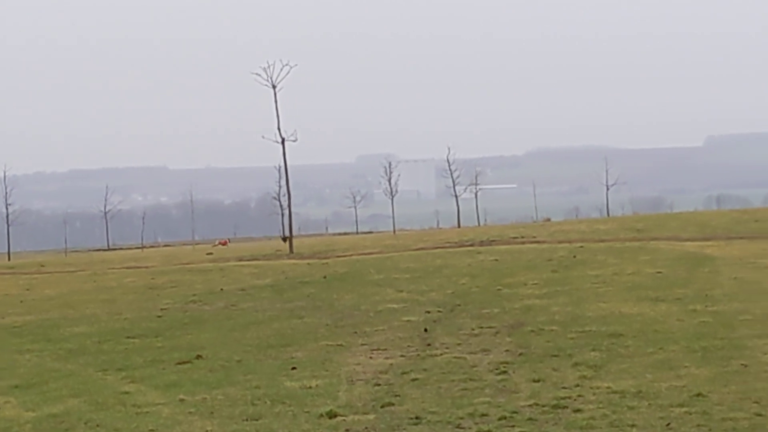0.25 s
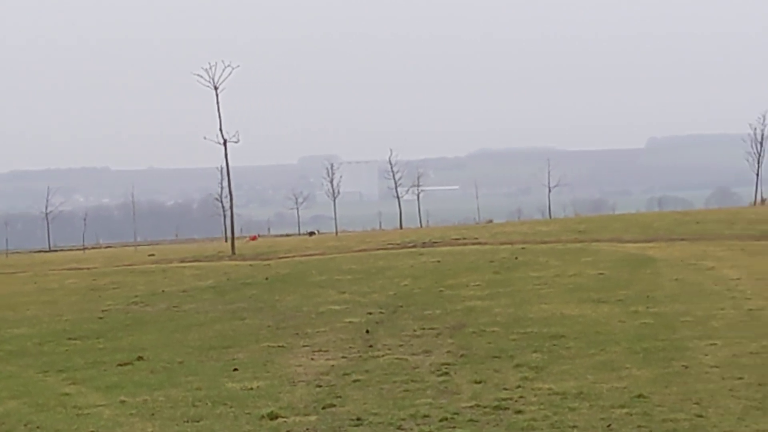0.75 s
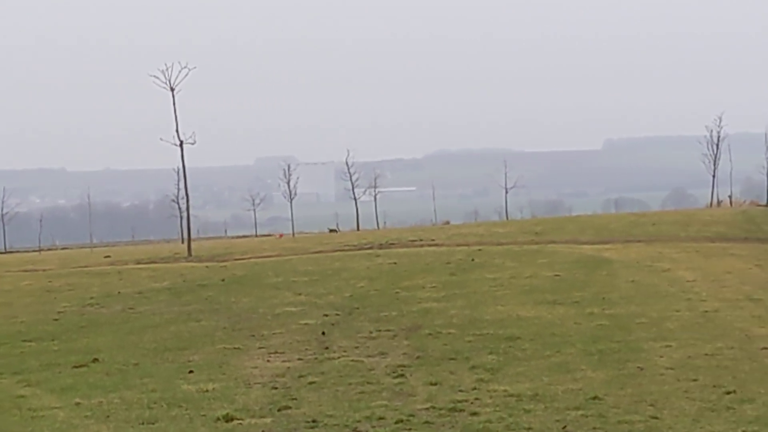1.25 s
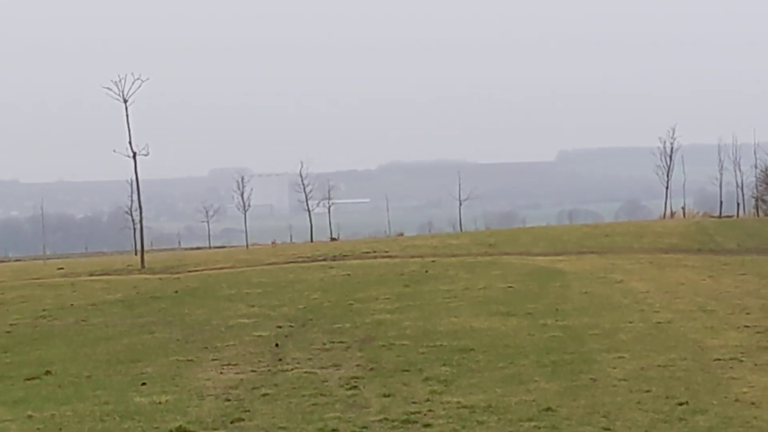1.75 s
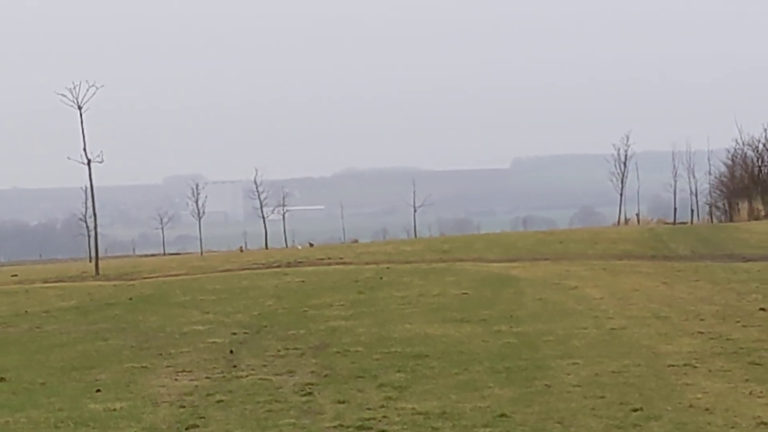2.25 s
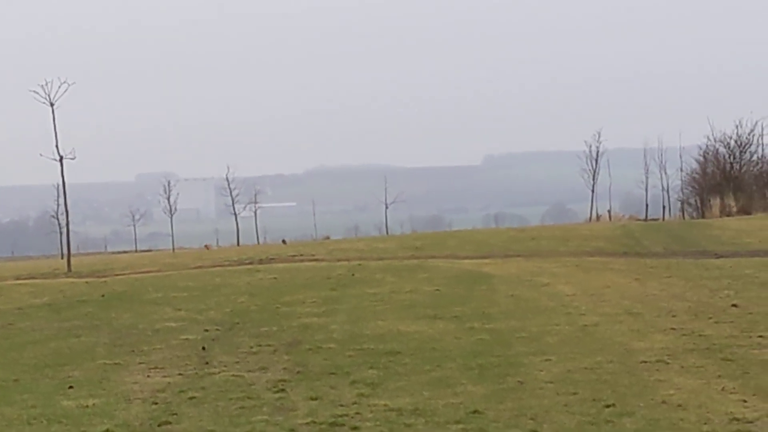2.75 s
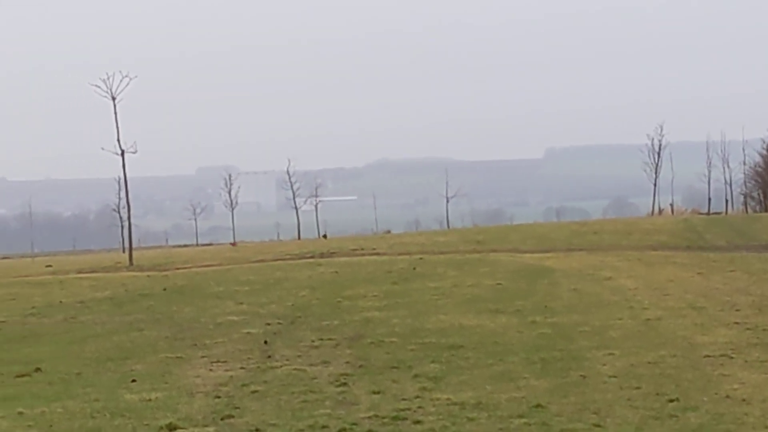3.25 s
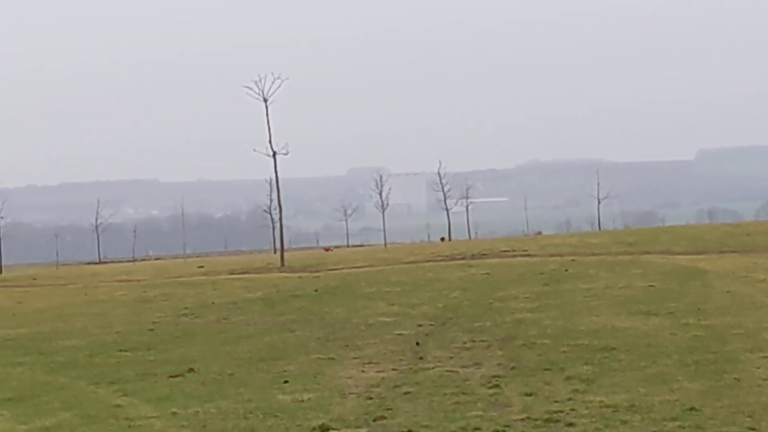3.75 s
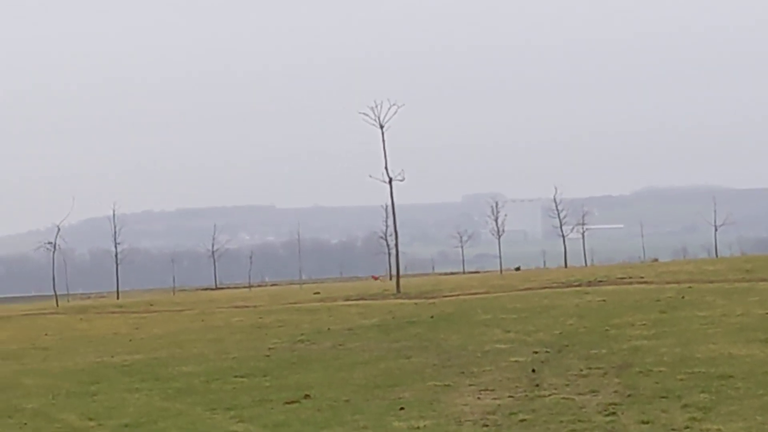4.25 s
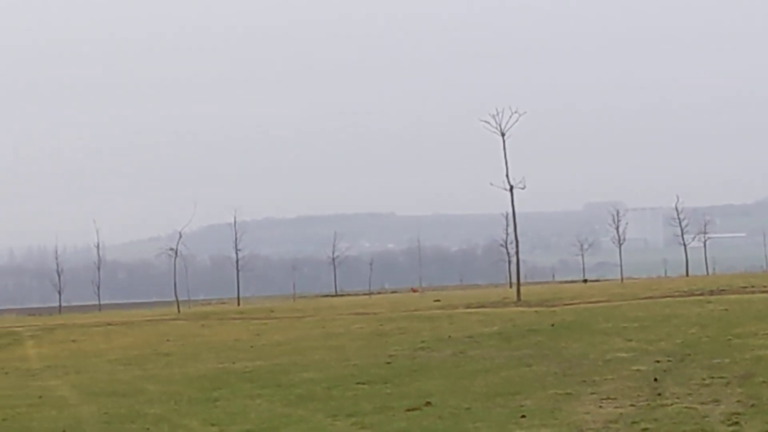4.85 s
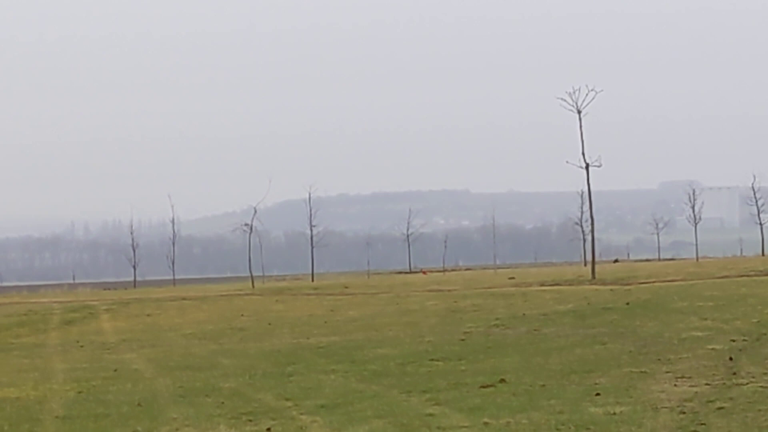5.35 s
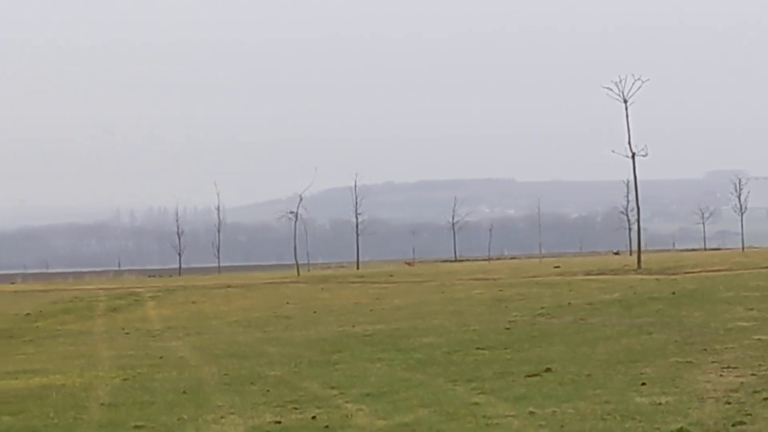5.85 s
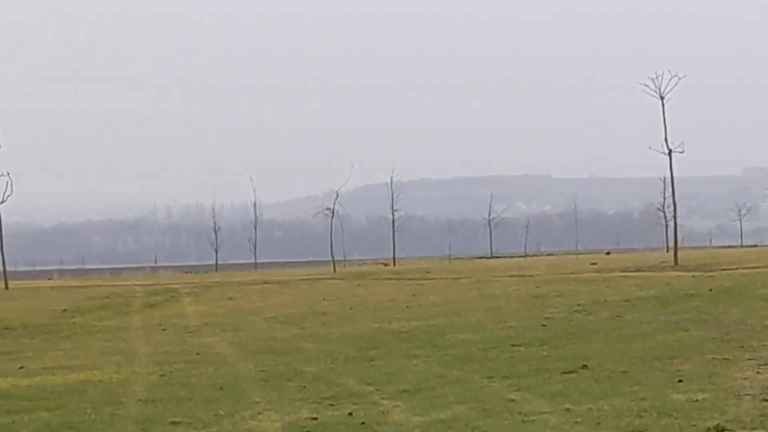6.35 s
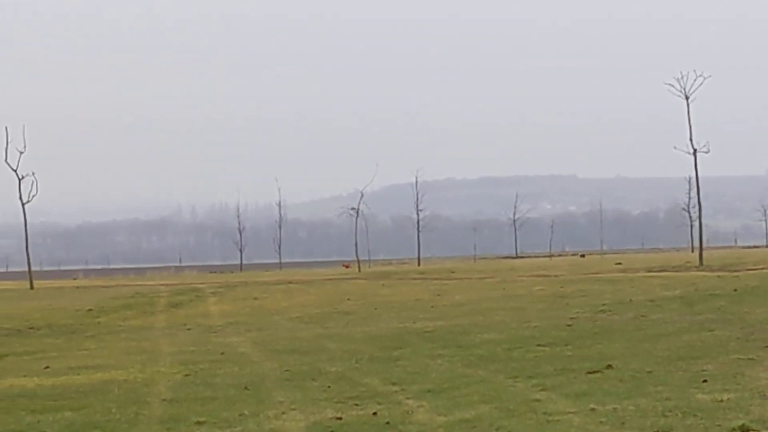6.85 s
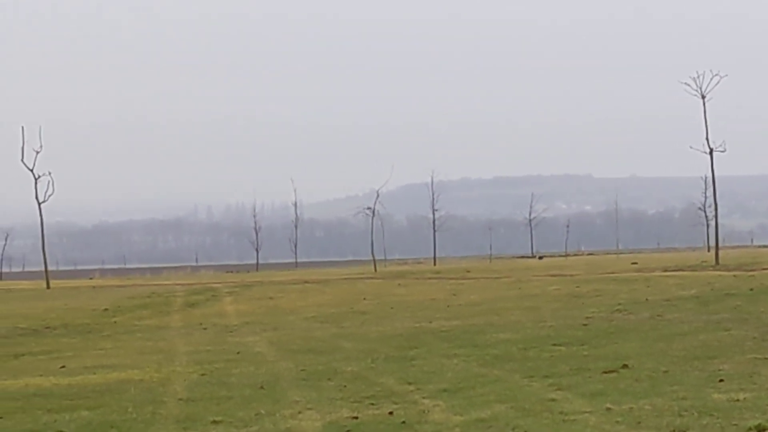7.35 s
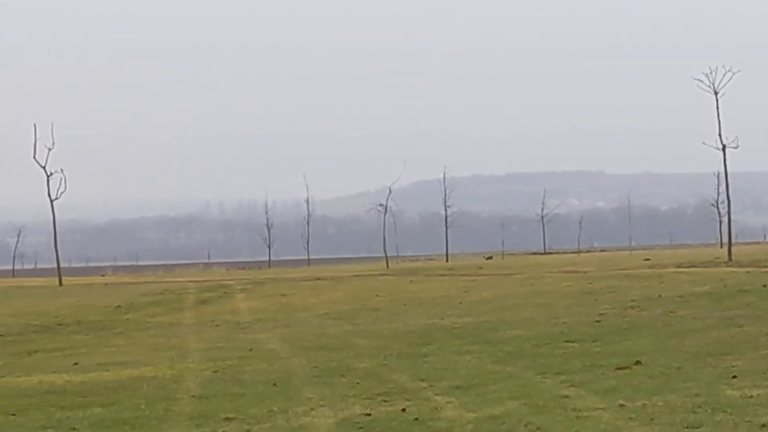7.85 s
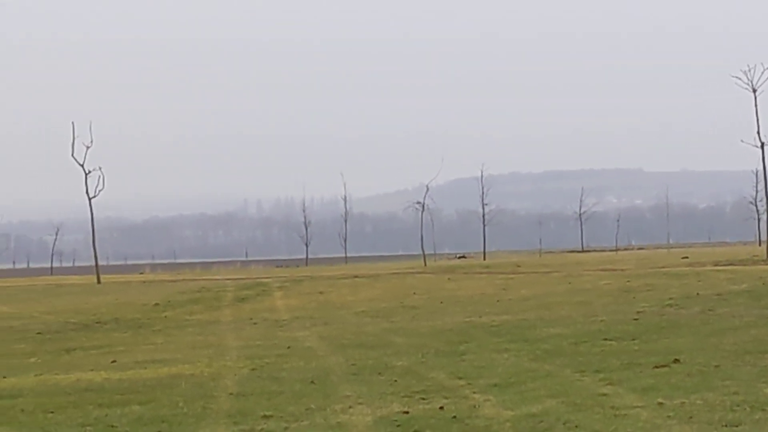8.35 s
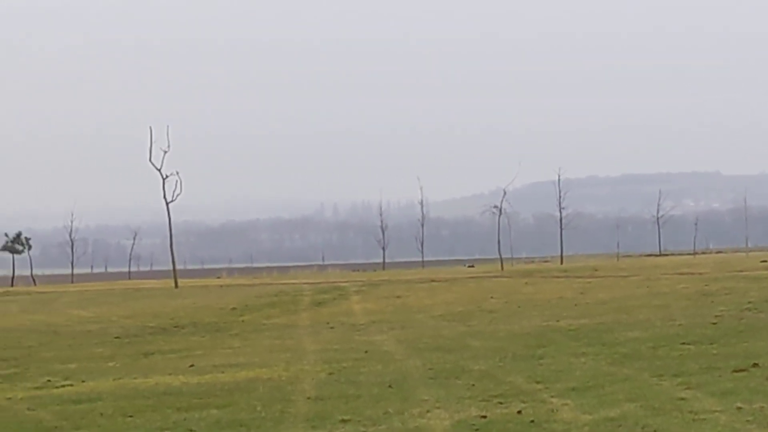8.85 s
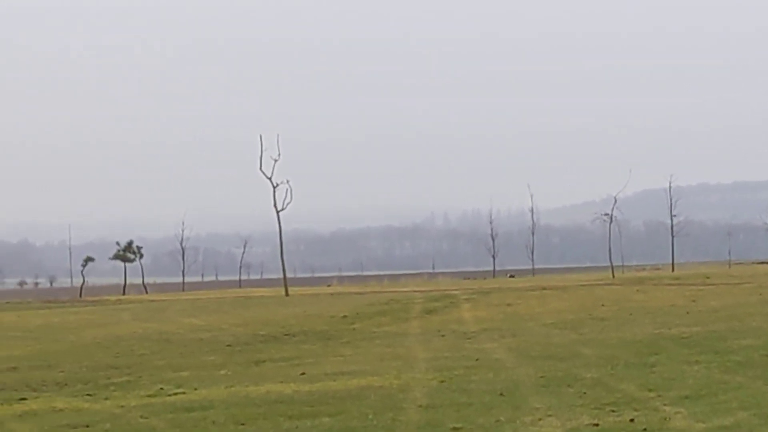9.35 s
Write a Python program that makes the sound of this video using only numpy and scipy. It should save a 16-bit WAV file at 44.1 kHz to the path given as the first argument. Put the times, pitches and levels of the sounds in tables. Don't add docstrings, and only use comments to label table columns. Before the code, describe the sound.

In a grassy open field, a little motor chugs rapidly and continuously with a hollow exhaust knock and breathy hiss. Its fan hum dips under load, then spins back up, again and again. Gusts strike the microphone ports as short, boomy low thumps, partly different left and right, with calmer gaps between. A single faint bird call rises and falls once. No reverberant space, only dry outdoor sound.

```python
import sys
import numpy as np
from scipy import signal
from scipy.fft import rfft, irfft
from scipy.io import wavfile
from scipy.ndimage import uniform_filter1d

SR = 44100
rng = np.random.default_rng(int(sys.argv[2]) if len(sys.argv) > 2 else 0)


def waveform_to_disk(signal):
    frames = np.transpose(np.atleast_2d(signal))
    scaled = np.clip(frames, -1, 1) * 32767
    samples = np.round(scaled).astype(np.int16)
    wavfile.write(sys.argv[1], SR, samples)


def boost(x):
    u = np.asarray(x, float) / 20
    return 10 ** u


N = 423360
T = np.arange(N) / SR
F = np.maximum(np.arange(N // 2 + 1) * SR / N, 1)
RIGHT_LAG_SAMPLES = 22
FAN_MEAN_HZ = 95


def level(x, db):
    return x * boost(db) / np.sqrt(np.mean(x ** 2))


def curves(table):
    s, *columns = np.transpose(table)
    return [np.interp(T, s, column) for column in columns]


def shape(points):
    hz, db = np.transpose(points)
    return np.interp(np.log(F), np.log(hz), db)


def colour(x, db):
    return irfft(rfft(x) * boost(db), N)


def walk(rate):
    k = int(SR / rate)
    steps = np.repeat(rng.standard_normal(N // k + 1), k)
    return 1.42 * uniform_filter1d(uniform_filter1d(steps, k), k)[:N]


# time in seconds, lead over an even beat in cycles.
BEAT_LEAD = [(0.0, 0.125), (0.7, -0.205), (1.2, -0.232), (1.5, -0.067), (1.8, -0.11), (2.89, -0.418),
             (3.19, -0.396), (3.39, -0.515), (3.89, -0.503), (6.09, 0.271), (6.19, 0.224), (6.29, 0.293),
             (6.59, 0.194), (7.38, 0.31), (8.08, 0.276), (8.38, 0.38), (8.78, 0.226), (9.6, 0.4)]


def firing_times():
    firing_hz = 17.8
    cycles = firing_hz * T + curves(BEAT_LEAD)[0]
    return np.interp(np.arange(1, int(cycles[-1]) + 1), cycles, T) - .0067


# pitch in Hz, decay in ms, level in dB, delay in ms (its sign does not matter), starting point in turns.
EXHAUST_RINGS = [
    (158, 6.8, -0.5, 8.5, 0.14),
    (273.5, 1.74, 3.5, 1.5, 0.15),
    (382.5, 2.88, 4, 0.5, 0.16),
    (597.8, 4.8, -5.5, 0.5, 0.78),
    (744, 1.6, -7, 1, 0.43),
    (1337, 3.6, -12.5, -6.5, 0.078),
]


def exhaust(times):
    firing_scatter_db, ring_scatter_db, detune, slip_ms = 1.4, 1.4, .025, .2
    out, t = np.zeros(N + SR), np.arange(SR // 16) / SR
    chance = rng.standard_normal((len(times), len(EXHAUST_RINGS), 4))
    for s, draw in zip(times, chance):
        bark = 0
        for (hz, decay_ms, db, delay_ms, turns), luck in zip(EXHAUST_RINGS, draw):
            since = np.maximum(t - abs(delay_ms + slip_ms * luck[0]) / 1000, 0)
            age = since * 1000 / decay_ms
            swell = age * np.exp(1 - age)
            pitch = hz * (1 + detune * luck[2])
            tone = np.sin(2 * np.pi * (pitch * since + turns))
            bark = bark + boost(db + ring_scatter_db * luck[1]) * swell * tone
        i = int(s * SR)
        out[i:i + len(t)] += bark * boost(firing_scatter_db * draw[0, 3])
    return level(out[:N], 0)


# frequency in Hz, level in dB per Hz.
HISS_COLOUR = [(60, 8), (110, 23.5), (220, 9.5), (450, 12.5), (800, 4.5), (1400, -0.5), (3300, -1),
               (3650, -16), (4900, -9), (5200, -5), (7000, -10.5), (10000, -16.5), (12500, -16.5),
               (15600, -23.5)]
# centre in Hz, width in Hz, boost in dB.
CASING_RINGS = [
    (1550, 60, -4),
    (1700, 35, 4),
    (1850, 80, -3),
    (2280, 170, 5),
    (3120, 100, 3),
    (7600, 300, -3),
    (10250, 350, -6),
]


def air():
    bounce_hz, bounce_peak_hz = 962, 7110
    treble = np.clip((F - 6000) / 800, 0, 1)
    ripple = 2.6 * treble * np.cos(2 * np.pi * (F - bounce_peak_hz) / bounce_hz)
    casing = sum(db * np.exp(-((F - hz) / width) ** 2) for hz, width, db in CASING_RINGS)
    return shape(HISS_COLOUR) + ripple + casing


def puff_gate(times):
    scatter_db, surge_db = 1.6, 1.3
    rise_ms, hold_ms, tail_ms, tail_db = .3, 5., 28., -9
    kicks, t = np.zeros(N), np.arange(SR // 16) / SR * 1000
    kicks[(times * SR).astype(int)] = boost(scatter_db * rng.standard_normal(len(times)))
    burst = np.exp(-(t / hold_ms) ** 2)
    tail = boost(tail_db) * np.exp(-t / tail_ms)
    gate = (1 - np.exp(-t / rise_ms)) * (burst + tail)
    return signal.fftconvolve(kicks * boost(surge_db * walk(6.5)), gate)[:N]


# frequency in Hz, change in dB.
PUFF_COLOUR = [(900, -2), (1400, 0), (1800, -6), (3000, -12), (3700, -2), (4300, -1), (5200, -4), (7000, 2),
               (9000, 4), (15600, 4)]


def gas_puffs(times):
    jet = puff_gate(times) * rng.standard_normal(N)
    return colour(jet, air() + shape(PUFF_COLOUR) + shape([(300, -32), (900, -3)]))


def patchy_noise():
    noise, out, octaves = rfft(rng.standard_normal(N)), 0, np.log2(F)
    for centre in np.arange(5.5, 14.6, .75):
        band = irfft(noise * np.clip(1 - abs(octaves - centre) / .75, 0, 1), N)
        out = out + band * boost(1.33 * walk(1.53))
    return out


# bite in seconds, fan rate then in Hz, let-go in seconds, fan rate then in Hz, whine at the bite in dB.
FAN_LOADS = [(-.3, 101, .08, 92, 0), (.55, 101, .88, 89, 1), (1.22, 94, 1.58, 84.5, -1),
             (2.35, 102, 2.63, 91, 0), (3.12, 99.5, 3.55, 85.5, -2), (3.82, 92.5, 4.05, 86, -4),
             (5.22, 102, 5.5, 91, 2), (6.25, 103, 6.47, 92.5, 3), (6.82, 100.5, 7.17, 88.5, 0),
             (7.42, 94.5, 7.65, 87.5, 2), (7.92, 94, 8.15, 87, 0), (8.62, 95.5, 8.9, 87, -3),
             (9.7, 96, 10, 88, -7)]


def fan_speed():
    spin_up_s, inertia_s = .7, .07
    bite, top_hz, free, low_hz, _ = np.transpose(FAN_LOADS)
    hz = np.interp(T, np.ravel([bite, free], "F"), np.ravel([top_hz, low_hz], "F"))
    for s, low, end, top in zip(free, low_hz, bite[1:], top_hz[1:]):
        up = (T > s) & (T < end)
        progress = np.expm1((s - T[up]) / spin_up_s) / np.expm1((s - end) / spin_up_s)
        hz[up] = low + (top - low) * progress
    return uniform_filter1d(hz, int(inertia_s * SR))


def fan(hz):
    turn = 2 * np.pi * np.cumsum(hz * (1 + .0015 * walk(20))) / SR
    drone_db = -30 + 1 * (hz - FAN_MEAN_HZ)
    drone = boost(-0.5 + 2.9 * walk(7)) * np.sin(turn) + np.sin(2 * turn)
    cowl_db = 6.5 * np.exp(-((5 * hz - 458) / 22) ** 2)
    strain_db = -.08 * np.gradient(hz) * SR
    whine_db = -38 + cowl_db + curves(FAN_LOADS)[-1] + strain_db
    return boost(drone_db + 1.8 * walk(8)) * drone + boost(whine_db + 1.3 * walk(7)) * np.sin(5 * turn)


# time in seconds, throttle effort in dB, carried treble in dB.
ENGINE_EFFORT = [(0, 1, 0), (.6, -0.5, 0.5), (1.05, 1, 0), (1.45, -1, -2), (1.6, -2, 2.5), (2.05, -3.5, -1),
                 (2.4, 0, 0), (2.8, -1.5, -0.5), (3.3, -1.5, -1), (3.6, 1.5, 1.5), (4.8, 1.5, 1),
                 (5.6, 1.5, -1), (6.3, 0.5, 1), (6.9, 0, 0.5), (7.6, 2, -0.5), (8.2, 0, -0.5), (8.9, 2, 1),
                 (9.6, 1.5, 0)]


def engine():
    times, hz = firing_times(), fan_speed()
    effort_db, carried_db = curves(ENGINE_EFFORT)
    carried_db = carried_db + .8 * walk(9)
    faster_hz = hz - FAN_MEAN_HZ
    gear_db = -43.5 + .45 * carried_db + 0.35 * faster_hz
    hiss_db = -40 + carried_db + 0.1857 * faster_hz
    noise = level(colour(patchy_noise(), air()), 11.0) + level(gas_puffs(times), 1.6)
    hiss = colour(noise, shape([(3300, -60), (3900, 0)]))
    gears = noise - hiss
    rush = boost(hiss_db) * hiss + boost(gear_db) * gears
    return boost(-28 + effort_db) * exhaust(times) + rush + fan(hz), hiss_db


# peak in seconds, level in dB, tilt in dB (upper eddies raised and deep ones
WIND_THUMPS = [(0.243, -11.5, -1.5), (1.038, -12.5, -3.5), (1.172, -21, -5), (1.367, -13.5, 15),
               (1.864, -3, 5), (1.921, -4.5, 3.5), (2.044, -10.5, 4), (2.561, -10, 42), (2.597, -8, -2),
               (2.674, -17, -4), (3.946, -18, -5), (4.041, -7.5, -4), (4.35, -13, -5.5), (4.873, -5.5, 7),
               (5.053, -3.5, -1.5), (5.473, -15, -4), (6.233, -5, -1), (6.518, -4.5, 4), (6.632, -6.5, 14),
               (6.715, -16, 10), (7.149, -15.5, 2), (7.611, -10.5, -1), (7.698, -13.5, 0), (8.092, -11, 4),
               (8.279, -7, 5), (8.376, -18, 1), (8.494, -13, 11), (8.705, -10.5, 1), (9.259, -10, -1)]
# full strength reached in seconds, level in dB, hold after that in seconds, rise and
# fade in dB per second, tilt in dB (upper eddies raised and deep ones lowered by this much).
WIND_SWELLS = [(0, -18.5, .01, 193, 1), (0.53, -24.5, 0.16, 40, -4), (1.097, -24, .1, 62, -2),
               (1.225, -10.5, .015, 250, -2), (1.41, -5, 0.071, 200, -2), (1.525, -11, 0.11, 220, 1.5),
               (1.952, -22, 0.19, 200, 3), (2.4, -21.5, 0.018, 120, 1), (3.176, -26.5, .02, 39, -5),
               (4.169, -10, 0.1, 198, -1.5), (4.63, -19.5, 0.0089, 150, -2),
               (4.945, -4.5, 0.024, 400, -3.5), (4.997, -16, 0.049, 300, 6), (5.28, -24.5, 0.14, 60, 2.5),
               (6.012, -17, 0.0093, 92, 10), (6.268, -15, 0.058, 152, 3), (6.823, -11, 0.046, 250, -1),
               (6.912, -8, 0.024, 150, 5), (6.974, -13.5, 0.044, 350, 11), (7.556, -27, .02, 60, 12),
               (7.88, -20.5, 0.068, 150, 0), (8.12, -19.5, .02, 200, 1), (8.744, -25, 0.033, 60, 4),
               (9.198, -23.5, 0.037, 43, 3)]


def gusts():
    breeze_db, breeze_upper_db = -41, 8.5
    thump_rise, thump_fall = 464, 454
    t = T[::32]
    power = boost(breeze_db) ** 2 + 0 * t
    tint = power * breeze_upper_db
    rows = [(s, db, 0, thump_rise, thump_fall, up) for s, db, up in WIND_THUMPS]
    rows += [(s, db, hold, fade, fade, up) for s, db, hold, fade, up in WIND_SWELLS]
    for s, db, hold, rise, fall, upper_db in rows:
        before, after = np.maximum(s - t, 0), np.maximum(t - s - hold, 0)
        lump = boost(db - rise * before - fall * after) ** 2
        power = power + lump
        tint = tint + lump * upper_db
    return np.interp(T, t, 10 * np.log10(power)), np.interp(T, t, tint / power)


# frequency in Hz, level in dB per Hz.
DEEP_EDDIES = [(15, -50), (50, -4.5), (75, 7), (100, 18), (135, 16.5), (180, -15), (400, -72)]
# frequency in Hz, level in dB per Hz.
UPPER_EDDIES = [(15, -72), (110, -19.5), (150, 3), (200, 0.5), (260, -12), (400, -21), (700, -53),
                (2500, -100)]


def wind():
    shared = 0.61
    thump_db, upper_db = gusts()
    pan_db = 0.9 * walk(39)
    eddies = rng.standard_normal((3, N))
    common = np.array([eddies[0], np.roll(eddies[0], RIGHT_LAG_SAMPLES)])
    eddies = np.sqrt(shared) * common + np.sqrt(1 - shared) * eddies[1:]
    deep = level(colour(eddies, shape(DEEP_EDDIES)), 0)
    upper = level(colour(eddies, shape(UPPER_EDDIES)), 0)
    thump = boost(-upper_db) * deep + boost(upper_db) * upper
    power = uniform_filter1d(uniform_filter1d(thump ** 2, size=900), size=900)
    return boost(thump_db - 1.0 + np.array([pan_db, -pan_db]) / 2) * thump / np.sqrt(power)


# time in seconds, pitch in Hz, level in dB.
BIRD_CALL = [
    (3.355, 3300, -56),
    (3.38, 3500, -47),
    (3.425, 3620, -47),
    (3.45, 4050, -45),
    (3.48, 4020, -46),
    (3.505, 3750, -48),
    (3.535, 3450, -50),
    (3.55, 3000, -54),
    (3.58, 3000, -58),
]


def bird():
    hz, db = curves(BIRD_CALL)
    start, end = BIRD_CALL[0][0], BIRD_CALL[-1][0]
    gate = np.clip(np.minimum(T - start, end - T) / .012, 0, 1)
    turn = 2 * np.pi * np.cumsum(hz * (1 + .01 * walk(150))) / SR
    call = boost(db + 2.5 + 2.5 * walk(90)) * gate * np.sin(turn)
    return call + boost(-4) * np.roll(call, 1500) + boost(-10) * np.roll(call, 2600)


# frequency in Hz, radians less late.
RIGHT_LAG_BEND = [(0, 0), (500, .1), (950, .8), (1700, .6), (2000, .3), (2700, -.9), (3200, -.4),
                  (4000, -.5), (4500, .2), (7500, -.2), (9000, .3), (10500, .9), (13000, 1.7), (14000, 1)]
# frequency in Hz, left over right in dB.
SIDE_TONE = [(1200, .3), (2200, -2.5), (2800, .5), (6000, .5), (6500, -1), (7200, .6)]


def scene():
    motor, hiss_db = engine()
    near = motor + bird()
    lag = 2 * np.pi * F * RIGHT_LAG_SAMPLES / SR - np.interp(F, *np.transpose(RIGHT_LAG_BEND))
    half_tone = shape(SIDE_TONE) / 2
    left = colour(near, half_tone)
    right = irfft(rfft(near) * boost(-half_tone) * np.exp(-1j * lag), N)
    scattered = air() + shape([(1200, -30), (1900, -3), (2700, -16), (4000, 0), (4500, -2), (5000, -11),
                               (5600, -3), (7500, 0), (15000, 2)])
    diffuse = [level(colour(rng.standard_normal(N), scattered), -6.3) for _ in range(2)]
    return np.array([left, right]) + boost(hiss_db) * np.array(diffuse) + wind()


def top_cut(x):
    return signal.sosfilt(signal.butter(12, 16320, fs=SR, output="sos"), x)


def record(dry):
    top = signal.ellip(8, .2, 60, 15600, fs=SR, output="sos")
    rounded = dry / (1 + dry ** 6) ** (1 / 6)
    return top_cut(signal.sosfilt(top, rounded))


dry = scene()
out = record(dry)
waveform_to_disk(out)
```